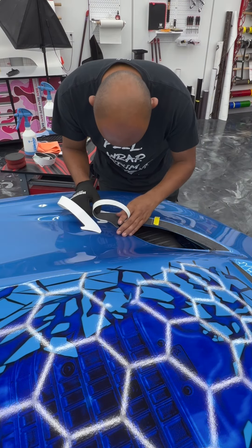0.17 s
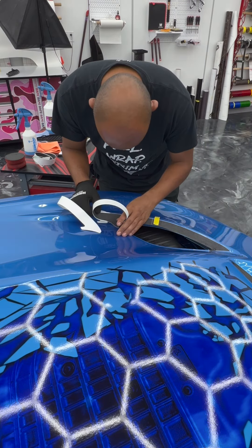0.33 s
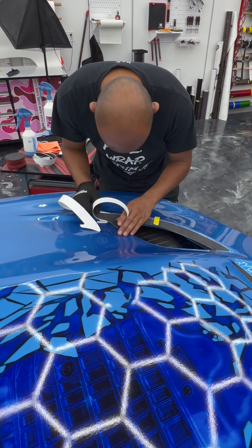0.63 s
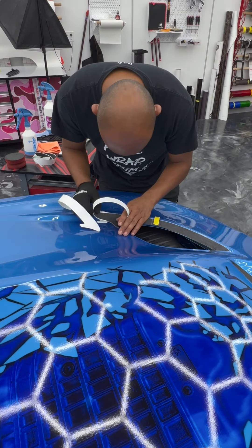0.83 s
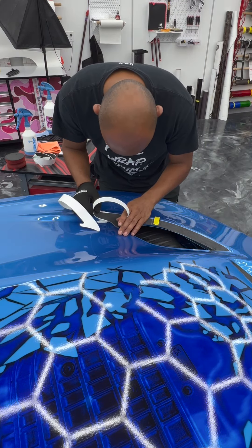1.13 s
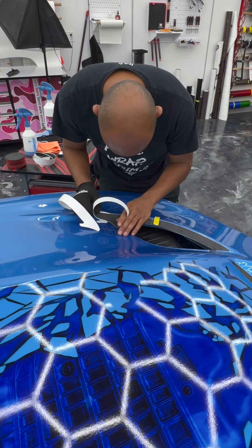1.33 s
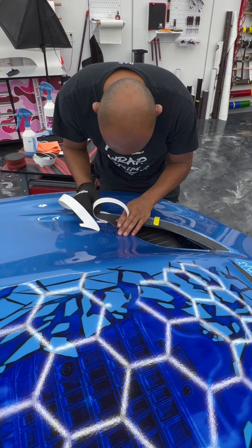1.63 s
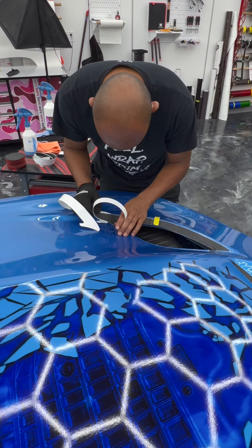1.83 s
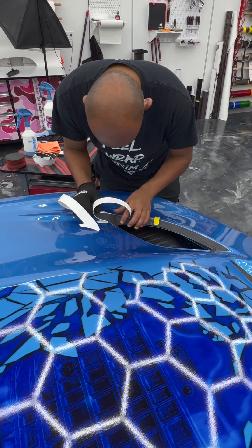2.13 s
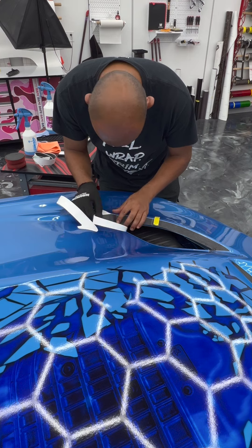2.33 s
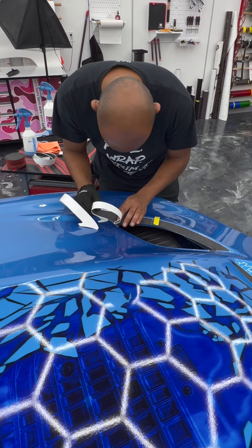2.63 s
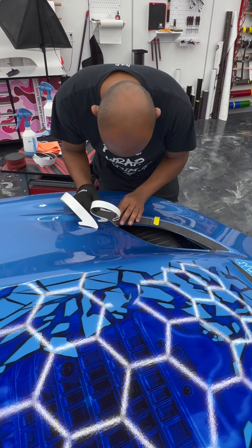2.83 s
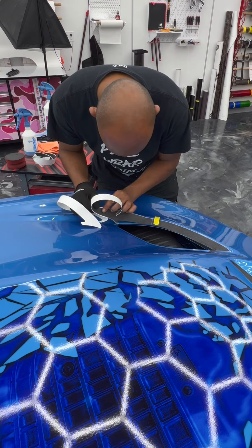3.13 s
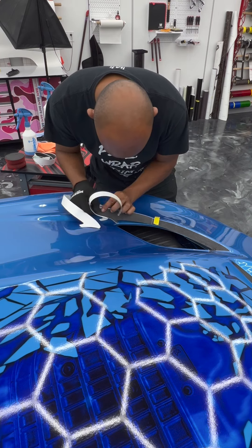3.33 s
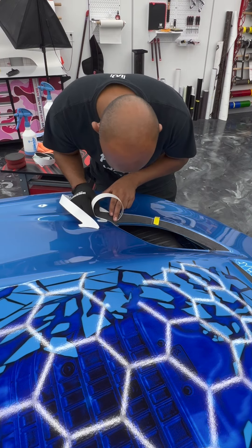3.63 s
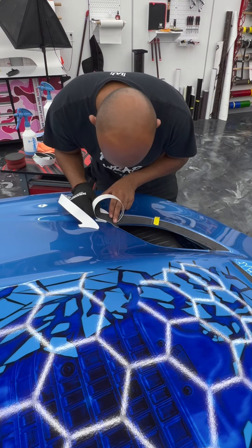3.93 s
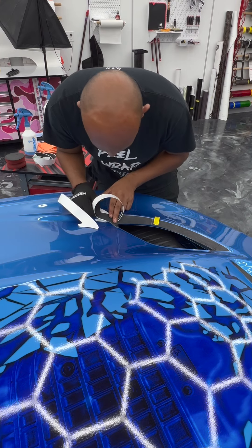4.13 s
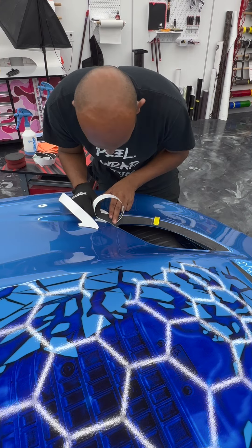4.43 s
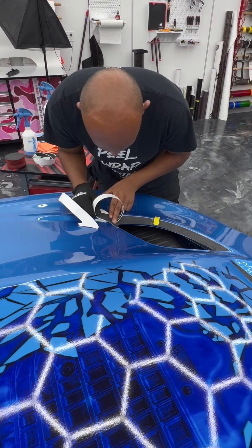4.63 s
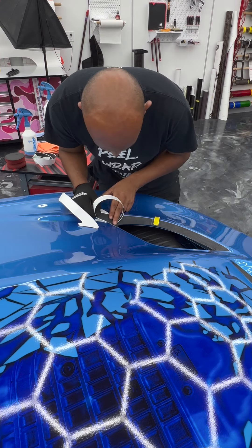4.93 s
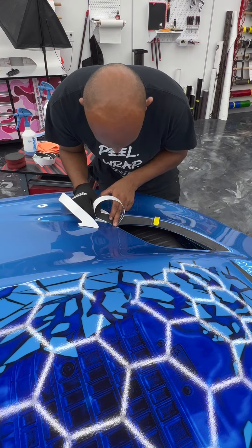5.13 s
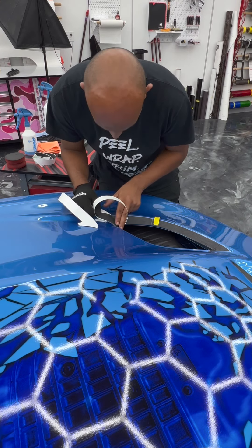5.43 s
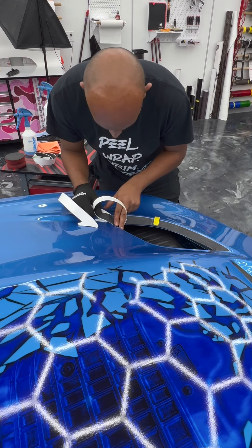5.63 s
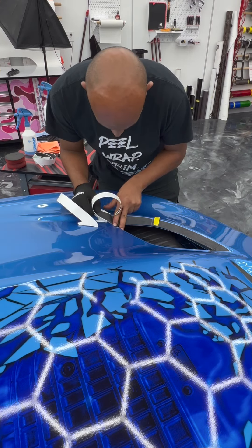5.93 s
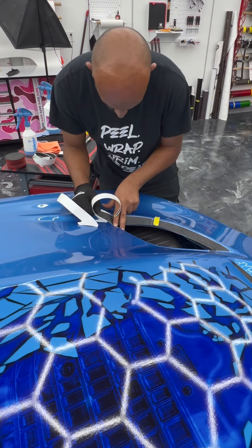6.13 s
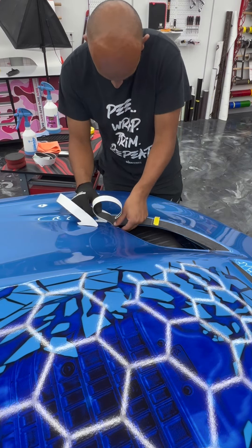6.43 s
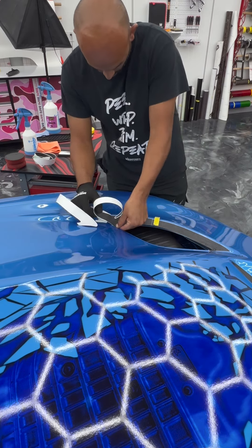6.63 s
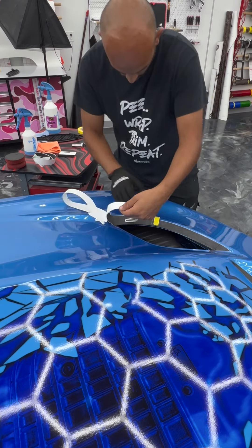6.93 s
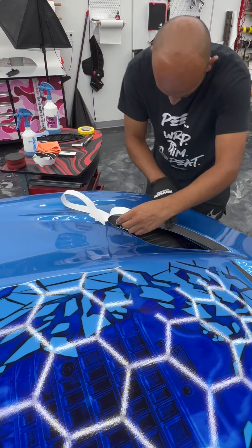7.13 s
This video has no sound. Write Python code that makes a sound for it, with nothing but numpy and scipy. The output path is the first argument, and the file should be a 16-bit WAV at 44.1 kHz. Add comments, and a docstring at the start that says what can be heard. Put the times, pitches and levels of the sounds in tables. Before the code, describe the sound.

A low, slightly wavering mains hum with rumble and faint air noise runs throughout a workshop, heard in close stereo with a short room decay. A tiny snap comes at 0.5 s, a brighter crack pair at 1.1 s, then soft glove sliding and another snap near 1.9 s. From 2.3 to 3.3 s, sharp snaps and short papery rips cluster, strongest around 2.4 s, with thin rustling and scattered ticks. From 3.5 to 4.9 s it is mostly hum, with one faint rub near 4.1 s. At 5.0 to 5.2 s, dull finger rubs judder the metal panel, then the loudest, piercing snap hits at 5.25 s with a low thump. Quick knocks and rubs follow around 5.8 to 6.15 s. From 6.45 to 6.85 s, denser knocks, scrapes and small snaps end in a deep double boom near 6.7 s. A faint rustle closes at 7.1 s.

```python
"""Peeling and rubbing a vinyl decal

In a workshop, a paper liner is peeled from a vinyl decal: snaps ring as damped modes, rips are grainy noise.
Gloved fingers then rub the vinyl onto a car hood, whose sheet metal judders, knocks and booms in its modes.
Ventilation noise and wavering mains hum fill the room; the walls add a short decaying tail.
A mid and side pair hears it in stereo, below a fixed band limit."""
import sys
import numpy as np
from scipy import signal
from scipy.fft import rfft, irfft, next_fast_len
from scipy.io import wavfile
from scipy.ndimage import uniform_filter1d, map_coordinates

SR = 44100
rng = np.random.default_rng(int(sys.argv[2]) if len(sys.argv) > 2 else 0)


def wrap_up_sound(samples):
    """Save the sound to the file named by the first command line argument, as 16-bit audio."""
    columns = np.atleast_2d(samples).T
    # keep every value between -1 and 1, then stretch to whole-number steps
    tamed = np.clip(columns, -1, 1)
    steps = np.round(tamed * 32767).astype(np.int16)
    wavfile.write(sys.argv[1], SR, steps)


N = 320607  # samples

# Sharp snaps: mostly glue cracks, with a few echoes and fingertip ticks:
# [t/s, level/dB, ringing pitch f/Hz, treble over ring/dB]
SHARP_SNAPS = [(0.5349, -43, 4500, 7), (1.1292, -36, 3440, 4), (1.141, -28.5, 3830, -9),
               (1.155, -41.5, 3680, -15.5), (1.337, -59, 3220, -9), (1.887, -30, 3400, 6),
               (1.899, -50, 3300, 0), (2.325, -49.5, 2204, -1), (2.3766, -42, 3353, 8.5),
               (2.4083, -22.5, 3760, 3.5), (2.4572, -29.5, 3200, 8), (2.489, -28.5, 2676, -8.5),
               (2.689, -56, 3720, 7), (2.713, -52, 4150, -6), (2.82, -36, 3470, -1.5),
               (2.9452, -46.5, 4220, 5.5), (3.048, -30.5, 5050, -18), (3.1205, -57, 4050, 12),
               (3.165, -41.5, 2220, 12), (3.1741, -37.5, 2230, 0), (3.2446, -39.5, 2100, 13),
               (3.285, -55, 3340, 11.5), (5.076, -51.5, 1935, 1.5), (5.2557, -13, 3730, -10.5),
               (5.258, -19, 3020, -1.5), (5.2684, -36.5, 3450, 9.5), (5.299, -55, 3290, 19),
               (5.3668, -34, 2470, -3.5), (6.2201, -37.5, 6040, -8.5), (6.2697, -62, 6000, 0),
               (6.45, -32.5, 3860, -5.5), (6.4791, -41, 2250, -9), (6.6338, -33, 1900, -20),
               (6.7135, -41, 2370, -3), (6.754, -44, 2920, -10), (6.847, -42.5, 2750, 13)]
# Lower modes of the snapping sheet: [multiple of the pitch, relative level/dB]
RING_MODES = [(0.551, -2), (1, 2.5), (1.599, -8)]
# Upper modes of the sheet: [f/Hz, width/Hz, relative level/dB]
SPIT_MODES = [(5700, 460, 1), (8000, 420, 4), (9720, 500, -12.5), (11400, 900, 0.5)]
RING_CYCLES = 9  # cycles of the pitch in which a ring falls 60 dB
# The fingertip's tick as it lands: delay/s, level/dB, its growth in dB per dB of brightness
TICK_S, TICK_DB, TICK_GROWTH = 0.003, -4.5, 0.6
TICK_HZ, TICK_TREBLE_DB = 1562, -12.5
# Faint random snaps: rate per s, level over the rustle/dB, dB per e-fold of a random size, central pitch/Hz
CRACKLE_PER_S, CRACKLE_DB, CRACKLE_SIZE_DB, CRACKLE_HZ = 12, 7.5, 2, 3340


def snaps():
    """Impulsive excitation: each snap or tick is a ring of a few cycles under a spit of treble."""
    ring, spit = np.zeros(N + SR), np.zeros(N + SR)
    t = np.arange(SR // 50) / SR
    level_db, = curves(RUSTLE_LEVEL)
    gap, size, pitch = rng.uniform(1e-6, 1, (300, 3)).T
    times = np.cumsum(-np.log(gap)) / CRACKLE_PER_S  # a Poisson process
    crackle = [(s, level_db[int(s * SR)] + CRACKLE_DB + CRACKLE_SIZE_DB * np.log(u), CRACKLE_HZ * (0.5 + v), -4)
               for s, u, v in zip(times, size, pitch) if s * SR < N]
    ticks = [(s + TICK_S, db + TICK_GROWTH * bright_db + TICK_DB, TICK_HZ, TICK_TREBLE_DB)
             for s, _, db, bright_db in FINGER_STROKES]
    for s, db, hz, treble_db in SHARP_SNAPS + ticks + crackle:
        detunes = rng.uniform(0.9, 1.08, len(RING_MODES))
        modes = np.zeros(len(t))
        for i, ((multiple, mode_db), detune) in enumerate(zip(RING_MODES, detunes)):
            sign = (-1) ** i
            modes += sign * amp(mode_db) * np.sin(2 * np.pi * hz * multiple * detune * t)
        onset = 1 - np.exp(-t / 0.000077)
        place(ring, s, amp(db - 60 * t * hz / RING_CYCLES) * onset * modes)
        place(spit, s, amp(db + treble_db - 60 * t / 0.0062) * rng.standard_normal(len(t)))
    ring = filtered(ring[:N], lambda hz: highpass(hz, 1000, 4))
    spit = filtered(spit[:N], lambda hz: peaks(SPIT_MODES, hz) * highpass(hz, 6000, 8) * lowpass(hz, 11900, 12))
    return ring + spit


# Liner tearing or crumpling, with a few soft rubs and glove scrapes:
# [t/s, length/s, level/dB, relative treble level/dB]
GRAINY_BURSTS = [(0.157, 0.025, -79.5, -4), (0.464, 0.031, -66.5, -4), (0.514, 0.0096, -62, 5),
                 (0.53, 0.0044, -63, 8.5), (0.537, 0.014, -66, 1), (0.55, 0.056, -83, -1.5),
                 (1.125, 0.0063, -59.5, -2), (1.138, 0.012, -61, -4), (1.63, 0.089, -78, -13),
                 (1.776, 0.031, -72, -6), (1.836, 0.034, -71.5, -9.5), (1.884, 0.013, -59, -3.5),
                 (2.207, 0.066, -79, 2), (2.305, 0.032, -63, -11.5), (2.373, 0.034, -51, -2),
                 (2.456, 0.044, -41, 2), (2.503, 0.061, -74.5, 8.5), (2.673, 0.016, -64.5, 3.5),
                 (2.811, 0.0094, -58.5, 3), (2.906, 0.076, -75, 1.5), (3.034, 0.0096, -66, 2),
                 (3.042, 0.0085, -47.5, -6.5), (3.162, 0.013, -51, -1), (3.24, 0.019, -59.5, -14),
                 (3.263, 0.023, -55, -17), (3.311, 0.064, -75.5, 5), (3.419, 0.07, -68, -2.5),
                 (3.93, 0.0062, -70.5, -19), (4.714, 0.014, -70.5, -14), (5.065, 0.027, -68, -4),
                 (5.183, 0.015, -70.5, -5.5), (5.246, 0.008, -56.5, -4), (5.252, 0.0091, -40, -17),
                 (5.272, 0.041, -76, 12.5), (5.346, 0.0053, -59.5, 1), (5.3657, 0.0048, -47.5, -0.5),
                 (5.423, 0.023, -71, -9.5), (5.686, 0.044, -78.5, 1), (6.165, 0.022, -73, -5),
                 (6.21, 0.056, -68.5, 0.5), (6.408, 0.027, -59.5, -6.5), (6.442, 0.038, -61.5, -1),
                 (6.676, 0.03, -57.5, -5), (6.708, 0.014, -52, -9), (6.778, 0.051, -72, -1.5),
                 (6.84, 0.024, -59, -5.5), (6.952, 0.027, -80, 8), (7.14, 0.1, -67.5, -0.5)]
# Liner moving: [t/s, level/dB]
RUSTLE_LEVEL = [(0, -84.5), (1.5, -88), (2.15, -85.5), (2.55, -67.5), (2.75, -74.5), (3.25, -72),
                (3.7, -85.5), (5.0, -85.5), (5.5, -84.5), (7.27, -79)]
# Spectral colour of the paper: [f/Hz, relative level/dB]
PAPER_COLOUR = [(410, -52), (700, -8.5), (901, -3), (1170, 1), (1670, 1.5), (3730, -2.5), (5170, -0.5),
                (6420, -6), (8470, -10.5), (11000, -14.5), (12400, -40.5), (16200, -120)]
SCRAPE_DB, SCRAPE_TREBLE_DB = -16.5, -8  # the glove's scrape under the bright part of its stroke


def liner():
    """Granular friction noise: rips, rubs and scrapes are dense grains over a faint rustle in paper's colour."""
    def paper(hz):
        return amp(along(PAPER_COLOUR, hz))

    grains = grit(4.5, 2200)
    spikes = grit(2.0, 900)
    dull = grains * patchy(coloured(lambda hz: paper(hz) * lowpass(hz, 5000, 8)), depth_db=4.0)
    bright = grains * spikes * patchy(coloured(lambda hz: paper(hz) * highpass(hz, 5000, 8)), depth_db=3.5)
    scrapes = [(s + TICK_S, 0.15 * length, db + bright_db + SCRAPE_DB, SCRAPE_TREBLE_DB)
               for s, length, db, bright_db in FINGER_STROKES]
    low, high = bursts(GRAINY_BURSTS + scrapes, rise=0.001, fall=0.0044, linger=0.025)
    level_db, = curves(RUSTLE_LEVEL)
    rustle = amp(level_db + 0.4 * wobble(3.9)) * grit(3.4, 300) * patchy(coloured(paper), depth_db=4.0)
    return low * dull + high * unit(bright) + rustle


# Finger strokes on the hood: [t/s, length/s, level/dB, relative brightness/dB]
FINGER_STROKES = [(1.82, 0.081, -54, -16), (2.377, .012, -56, -18), (2.467, 0.02, -58.5, -19.5),
                  (3.255, 0.016, -62, -2), (4.052, 0.029, -53.5, -10), (4.949, 0.05, -43, -23.5),
                  (5.022, 0.047, -39.5, -26.5), (5.129, 0.011, -36, -12), (5.144, 0.024, -34.5, -21),
                  (5.24, 0.041, -44.5, -15.5), (5.819, 0.0078, -47.5, -5), (5.834, 0.04, -49.5, -27),
                  (5.9, 0.026, -44, -13.5), (6.059, 0.013, -44, -15), (6.065, 0.027, -36.5, -8.5),
                  (6.087, 0.012, -34.5, -0.5), (6.103, 0.02, -36.5, -31), (6.15, 0.025, -44, -9),
                  (6.467, 0.031, -58, -12), (6.521, 0.022, -42, -8), (6.546, 0.019, -39, -21),
                  (6.635, 0.0072, -33.5, -2), (6.648, 0.011, -34.5, -1.5), (6.671, 0.013, -42.5, -13),
                  (6.687, 0.017, -32.5, -5.5), (6.708, 0.015, -38, -9), (6.746, 0.014, -49.5, -3),
                  (6.843, 0.03, -52.5, -4), (7.142, 0.034, -62.5, 0)]
# Glove sliding softly on the hood: [t/s, level/dB]
SLIDE_LEVEL = [(0, -87), (1.15, -78), (1.4, -71), (1.84, -68), (1.95, -82), (3.3, -70.5), (3.62, -98),
               (4.9, -88.5), (5.4, -80.5), (6.74, -75), (7.27, -93)]
# Spectral colour of the rubbed sheet metal: [f/Hz, relative level/dB]
SHEET_COLOUR = [(29, -24), (50, 5.5), (187, 4), (532, -7.5), (642, -10), (859, -11), (985, -14.5),
                (1210, -17), (2170, -35.5), (3000, -57), (3900, -120)]
# Modes of the hood panel: [f/Hz, width/Hz, relative level/dB]
HOOD_MODES = [(170, 30, -1), (275, 30, 6), (350, 18, 11), (470, 40, 13), (634, 35, 7), (840, 40, 1),
              (1430, 60, -12)]
SHAKE_DB, SHAKE_BRIGHT_DB = -4.5, -3.5  # every grainy burst shakes the hood under it
KNOCK_DB = 0.5  # the landing knock over the judder


def hood():
    """Modal response to friction: each push starts with a knock, then the panel judders in its modes."""
    def panel(hz):
        return amp(along(SHEET_COLOUR, hz)) * (0.58 + 0.5 * peaks(HOOD_MODES, hz))

    judder = grit(2.2, 140)
    body = judder * coloured(lambda hz: panel(hz) * lowpass(hz, 450, 6))
    edge = judder * coloured(lambda hz: panel(hz) * highpass(hz, 480, 6))
    shakes = [(s, length, db + SHAKE_DB, SHAKE_BRIGHT_DB) for s, length, db, _ in GRAINY_BURSTS]
    pushes = FINGER_STROKES + shakes
    low, high = bursts(pushes, rise=0.0044, fall=0.0061, linger=0.15)
    slide_db, = curves(SLIDE_LEVEL)
    high = high + amp(slide_db + 1.5 * wobble(9))

    knocks = np.zeros(N + SR)
    t = np.arange(SR // 10) / SR
    soft = (1 - np.exp(-t / 0.002)) ** 2  # a fingertip lands gently
    chances = rng.standard_normal((len(pushes), len(HOOD_MODES)))
    for (s, _, db, bright_db), chance in zip(pushes, chances):
        for (hz, width, _), luck in zip(HOOD_MODES, chance):
            level_db = db + KNOCK_DB + 2.5 * luck + bright_db * (hz > 400)
            decay = np.exp(-np.pi * 1.5 * width * t)
            place(knocks, s, amp(level_db) * decay * soft * np.sin(2 * np.pi * hz * t))
    rubbing = (low * body + high * edge) * amp([[0], [-4]])
    return rubbing + knocks[:N] * [[1], [0]]  # knocks in the mid only


# A hand's weight flexes the whole panel: [t/s, level/dB]
HAND_LEANS = [(5.251, -35), (6.091, -36.5), (6.685, -28.5), (6.713, -23.5)]
FLEX_HZ, FLEX_T60_S, FLEX_RISE_S = 86, 0.12, 0.0022


def flex():
    """A single damped mode: the whole panel gives a low, short boom."""
    boom = np.zeros(N + SR)
    t = np.arange(SR // 2) / SR
    onset = 1 - np.exp(-t / FLEX_RISE_S)
    for s, db in HAND_LEANS:
        place(boom, s, amp(db - 60 * t / FLEX_T60_S) * onset * np.sin(2 * np.pi * FLEX_HZ * t))
    return boom[:N]


# Reverberation time of the workshop: [f/Hz, t60/s]
WALL_DECAY = [(200, .35), (2500, .2), (10000, .19)]


def walls(x):
    """Diffuse reverberation: the workshop answers with noise that decays at its own speed at each frequency."""
    hz, t, z = signal.stft(rng.standard_normal((2, SR // 2)), SR, nperseg=256)
    decay = amp(-60 * t / along(WALL_DECAY, hz)[:, None])
    tail = signal.istft(z * decay, SR, nperseg=256)[1]
    delayed = np.pad(x, (400, 0))  # samples before the tail begins
    return signal.fftconvolve(delayed[None], tail / np.linalg.norm(tail[0]), axes=1)[:, :N]


# Levels of the low room tone: [t/s, rumble level/dB, hum level/dB, level of the hum's octave/dB]
DRONE_LEVELS = [(0, -53, -49, -54), (2.2, -52.5, -61, -51), (2.4, -55.5, -56.5, -48.5),
                (3.5, -50.5, -57.5, -46.5), (4.15, -51, -46.5, -49), (7.27, -51.5, -48, -48.5)]
# Spectral colour of the room: [f/Hz, relative level/dB]
ROOM_COLOUR = [(12, -39.5), (20, -8), (49, 1.5), (90, 2), (118, -2), (135, -6), (147, -16.5), (356, -29),
               (548, -34.5), (611, -35.5), (991, -48.5), (2350, -59), (4600, -78.5), (6350, -68),
               (12400, -99.5), (16200, -120)]
# A fuzzy line in the drone: [f/Hz, width/Hz, relative level/dB]
BUZZ_LINE = [(362.4, 2.6, 8)]
MAINS_HZ, AIR_DB = 58.34, -83


def workshop():
    """Stationary noise and phase-modulated tones: rumble, wavering hum lines, drone and airflow."""
    def tone(hz):
        return amp(along(ROOM_COLOUR, hz))

    def low(hz):
        return lowpass(hz, 140, 6)

    def split(hz):
        return lowpass(hz, 450, 6)

    def middle(hz):
        return lowpass(hz, 1300, 4)

    rumble_db, mains_db, double_db = curves(DRONE_LEVELS)
    rumble = amp(rumble_db + 1.2 * wobble(3)) * coloured(lambda hz: tone(hz) * low(hz))
    turn = 2 * np.pi * MAINS_HZ * np.arange(N) / SR
    hum = amp(mains_db + 2.5 * wobble(4)) * np.sin(turn + 1.2 * wobble(7))
    octave = amp(double_db + 1.2 * wobble(6)) * np.sin(2 * turn + 2.49 * wobble(4))
    drone_noise = coloured(lambda hz: tone(hz) * (1 - low(hz)) * split(hz) * (1 + peaks(BUZZ_LINE, hz)))
    drone = amp(-57.5 + 1.8 * wobble(3.543)) * drone_noise
    gusts_db = 1.5 * wobble(8)
    air = amp(AIR_DB + gusts_db) * coloured(lambda hz: tone(hz) * (1 - split(hz)) * middle(hz))
    hiss = amp(-81.0 + 0.9 * wobble(9.1)) * coloured(lambda hz: tone(hz) * (1 - middle(hz)))
    return rumble + hum + octave + drone + (air + hiss) * amp([[0], [3]])


# The microphone pair: [f/Hz, side gain/dB]
SIDE_GAIN = [(60, -60), (170, -28), (500, 2.5), (900, 5), (1300, -0.5), (1900, -12), (2800, 1), (4000, -7),
             (5100, -4.5), (6500, -20), (8300, -3.5), (9700, -11), (11300, 3), (12400, -6.5)]


def scene():
    """Mid-side stereophony: side hears diffuse sound, and the treble of near sounds a little late."""
    def alike(hz):
        return 0.33 * highpass(hz, 1800, 6)

    def late(hz):
        return np.exp(-2j * np.pi * hz * 0.000515)  # delay in s

    def notch(hz):
        return 1 - 0.54 / (1 + ((hz - 5050) / 350) ** 2)  # the microphone ports cancel each other here

    mid, other = liner() + hood()
    mid = mid + snaps() + flex()
    wet = amp(-17.5) * walls(mid)
    tone = workshop()
    shared = filtered(mid, lambda hz: alike(hz) * late(hz))
    unrelated = filtered(other, lambda hz: np.sqrt(1 - np.minimum(alike(hz), 1) ** 2))
    side = filtered(shared + unrelated + wet[1] + tone[1], lambda hz: amp(along(SIDE_GAIN, hz)))
    mid = filtered(mid + wet[0] + tone[0], lambda hz: notch(hz) * lowpass(hz, 11700, 24))
    return np.array([mid + side, mid - side])


TOP_HZ = 12400


def record(dry):
    """Band limitation: the recorder keeps nothing at or above its top frequency."""
    return filtered(dry, lambda hz: hz < TOP_HZ)


def bursts(rows, rise, fall, linger):
    """Exponential envelopes (dull, bright) that start, hold and fade; long ones rise and fade more gently."""
    low, high = np.zeros(N + SR), np.zeros(N + SR)
    t = np.arange(SR) / SR
    for s, length, db, bright_db in rows:
        attack = 1 - np.exp(-t / (rise + linger * length))
        release = np.exp(-np.maximum(t - length, 0) / (fall + linger * length))
        place(low, s, amp(db) * attack * release)
        place(high, s, amp(db + bright_db) * attack * release)
    return low[:N], high[:N]


def patchy(x, depth_db):
    """Time-frequency modulation by random patches of gain: the flexing sheet keeps changing its colour."""
    z = signal.stft(x, nperseg=256)[2]
    field = rng.standard_normal(z.shape[1:])
    field = uniform_filter1d(field, size=7, axis=0)
    field = uniform_filter1d(field, size=6, axis=1)
    return unit(signal.istft(z * amp(depth_db * unit(field)), nperseg=256)[1][:, :N])


def grit(spread_db, rate):
    """Stick-slip modulation: a spiky gain of rms 1, as friction lets go in uneven grains."""
    return unit(amp(spread_db * wobble(rate)))


def coloured(gain):
    """Spectral shaping: two unrelated noises (mid, side), scaled to a joint rms of 1."""
    return unit(filtered(rng.standard_normal((2, N)), gain))


def peaks(modes, hz):
    """Modal superposition: a sum of bell-shaped resonances."""
    return sum(amp(db) / np.sqrt(1 + (2 * (hz - centre) / width) ** 2) for centre, width, db in modes)


def lowpass(hz, corner, order):
    """Low-pass response: the gain is halved at the corner and falls above it."""
    return 1 / (1 + (hz / corner) ** order)


def highpass(hz, corner, order):
    """High-pass response: the gain is about halved at the corner and falls below it."""
    return 1 / (1 + (corner / (hz + 1)) ** order)


def filtered(x, response):
    """Linear filtering: the spectrum of x times a response of frequency."""
    m = next_fast_len(N + SR // 2)
    return irfft(rfft(x, m) * response(np.fft.rfftfreq(m, 1 / SR)), m)[..., :N]


def place(track, s, sound):
    """Superposition: adds a sound to the track at s seconds."""
    track[round(s * SR):][:len(sound)] += sound


def wobble(rate):
    """Slow random modulation: a smooth curve with rate knots a second."""
    return map_coordinates(rng.standard_normal(int(N * rate / SR) + 4), [np.arange(N) * rate / SR])


def curves(rows):
    """Linear interpolation in time: one value per sample for each column after t."""
    s, *columns = np.transpose(rows)
    return [np.interp(np.arange(N) / SR, s, column) for column in columns]


def along(points, hz):
    """Interpolation of (f/Hz, value) points on a logarithmic frequency axis."""
    f, v = np.transpose(points)
    return np.interp(np.log(hz + 1), np.log(f + 1), v)


def amp(db):
    """Logarithmic level: decibels to amplitude gain."""
    return 10 ** (np.asarray(db) / 20)


def unit(x):
    """Normalisation: x scaled to rms 1."""
    return x / np.sqrt(np.mean(x ** 2) + 1e-20)


dry = scene()
out = record(dry)
wrap_up_sound(out)
```